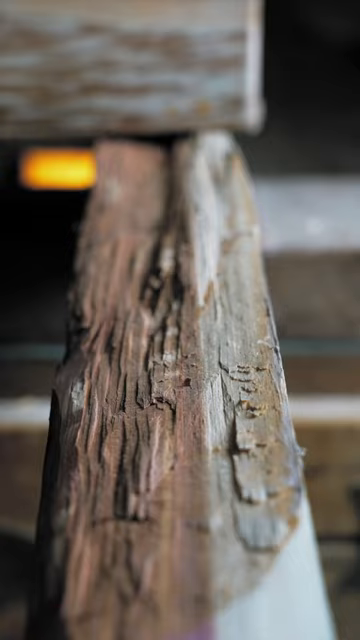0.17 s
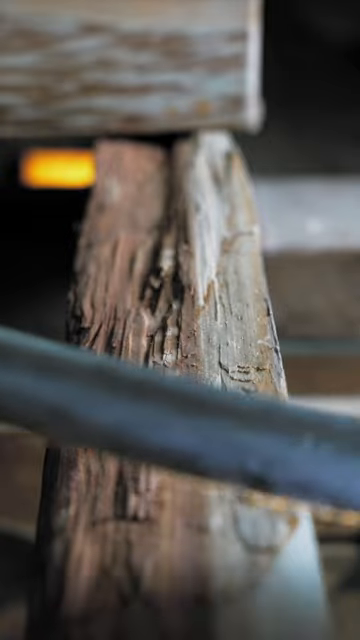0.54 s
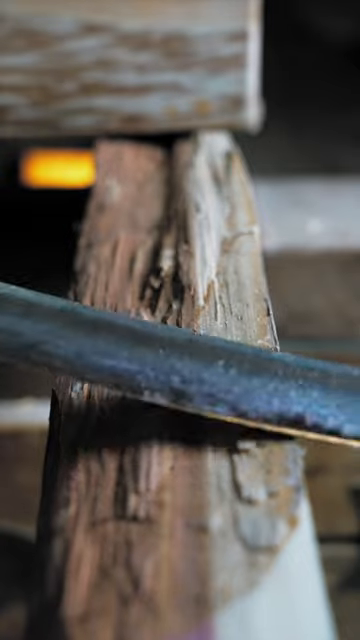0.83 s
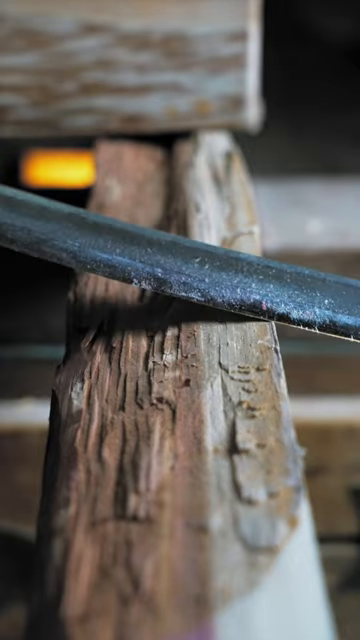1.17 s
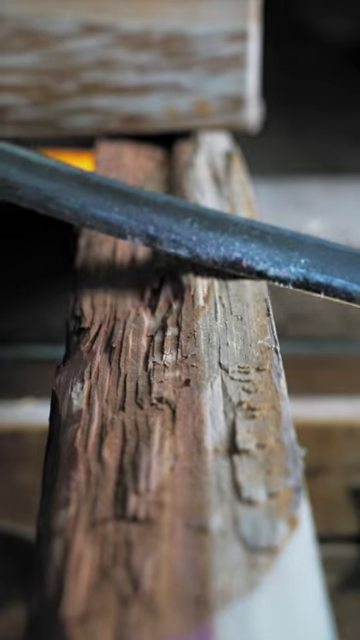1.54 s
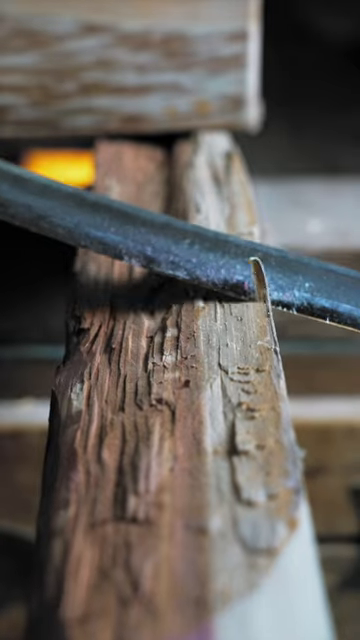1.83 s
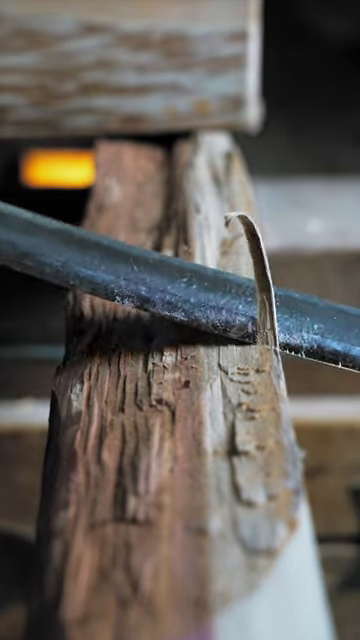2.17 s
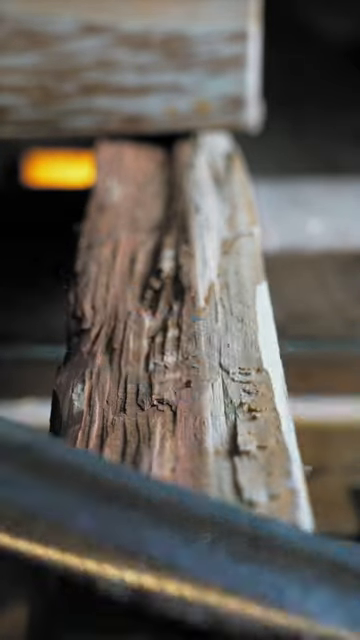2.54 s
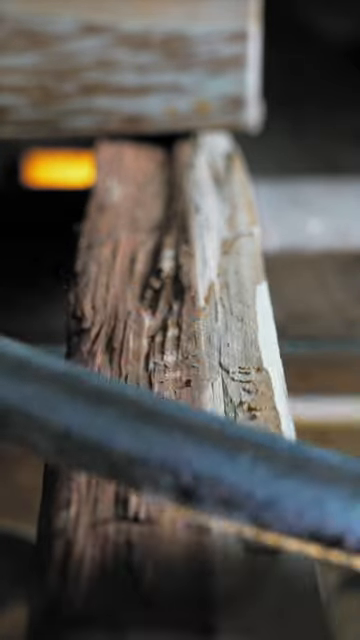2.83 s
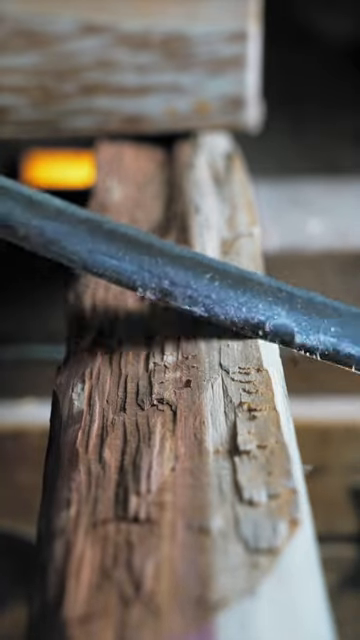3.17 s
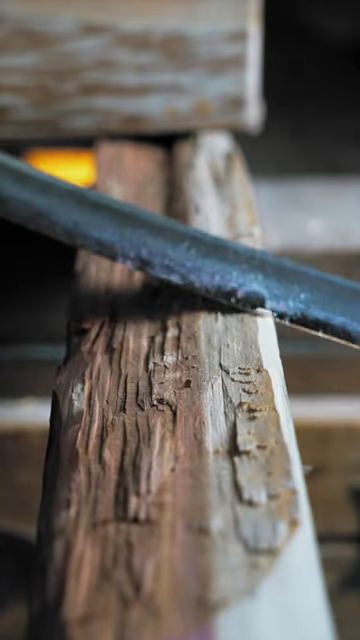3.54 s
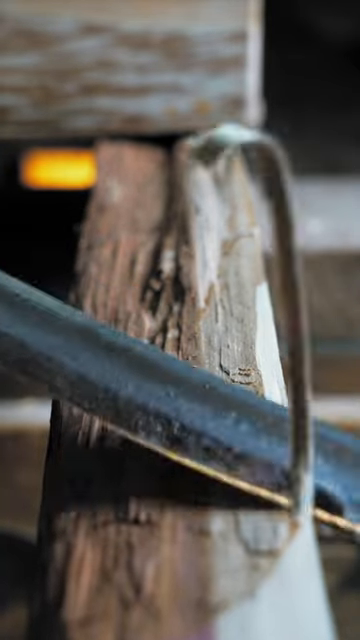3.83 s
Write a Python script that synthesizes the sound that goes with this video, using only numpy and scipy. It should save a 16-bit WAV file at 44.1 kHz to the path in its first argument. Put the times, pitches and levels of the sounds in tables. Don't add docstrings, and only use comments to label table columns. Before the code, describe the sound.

Drawknife scraping and slicing a wooden stave, fibres crackling brightly, one hard knock between pulls, quiet workshop

```python
import sys
import numpy as np
from scipy import signal
from scipy.fft import rfft, irfft
from scipy.io import wavfile
from scipy.ndimage import uniform_filter1d

SR = 44100
rng = np.random.default_rng(int(sys.argv[2]) if len(sys.argv) > 2 else 0)


def to_wav(s):
    ch = np.atleast_2d(s).T
    pcm = np.round(np.clip(ch, -1, 1) * 32767)
    wavfile.write(sys.argv[1], SR, pcm.astype(np.int16))


def elevation(decibels):
    levels = np.asarray(decibels, float)
    return 10 ** (levels / 20)


N = 176400
T = np.arange(N) / SR

# f/Hz, level/dB per Hz
ROOM_TONE = [(12, -24.5), (20, 6.5), (228, -4.5), (301, -6), (459, -7), (642, -30), (3950, -33),
             (13900, -34), (16000, -60)]
# f/Hz, width/Hz, level/dB
HUMS = [(462.5, 34, -71.5), (6750, 20, -102), (7260, 45, -97), (13900, 37, -101), (14200, 83, -92),
        (14300, 30, -103)]
# t/s, level/dB, f/Hz, length/s
LOW_THUMPS = [(0.51, -48, 87, 0.14), (0.85, -46, 60.7, 0.055), (1.8, -57.5, 43.4, 0.24),
              (2.223, -47.5, 67, 0.024), (1.955, -61, 191, 0.15), (2, -58.5, 188, 0.15),
              (3.1, -55.5, 200, 0.061), (2.1, -48, 372, 0.038), (2.628, -45.5, 75, 0.035),
              (3.025, -49, 370, 0.029), (3.218, -49.5, 70, 0.1), (3.635, -53, 76, 0.11),
              (3.63, -55.5, 179, 0.16), (3.684, -56, 339, 0.18), (3.96, -49.5, 54, 0.055)]
# t/s, level/dB, hard edge/dB, pitch factor
BLADE_KNOCKS = [
    (.853, -35, -31, .975),
    (0.889, -43, -17, .96),
    (2.646, -47.5, -14.5, 1.01),
    (3.202, -20.5, -9, 1),
]
# f/Hz, level/dB, time to fade 60 dB/s
STAVE_MODES = [(190.5, -22, .3), (294.8, -15, 0.3), (351, -16.5, 0.16), (411, -1.5, 0.063), (443, 2.5, .3),
               (487.3, -2, .12), (546, -7, 0.077), (665, -18, 0.072)]
# f/Hz, level/dB, time to fade 60 dB/s
EDGE_MODES = [(882, -2.5, 0.014), (1230, 4, 0.0088), (1675, 2, .01), (2550, -6, 0.0077),
              (3800, -22, 0.0034)]
# t/s, peak level/dB, f/Hz
FIBRE_SNAPS = [(0.1017, -48, 8300), (0.1949, -51, 8760), (0.1991, -28, 14900), (0.213, -35, 13100),
               (0.6564, -69, 14200), (1.807, -38.5, 15200), (1.8134, -51, 3200), (1.8491, -35.5, 11600),
               (1.8617, -34, 15100), (1.8844, -34, 15200), (1.8946, -28.5, 14200), (1.9084, -42, 15100),
               (1.9908, -30.5, 6260), (1.9984, -31, 10600), (2.019, -36, 11900), (2.029, -39.5, 6340),
               (2.062, -39, 3650), (2.079, -50, 3560), (2.121, -33.5, 13400), (2.1525, -43, 13100),
               (2.1954, -45, 8400), (2.2279, -31.5, 6700), (2.2324, -32, 13900), (2.2517, -24, 15500),
               (2.2554, -30, 15300), (2.2744, -36, 13200), (2.2807, -26, 15400), (2.3168, -31, 12540),
               (2.3236, -33, 14300), (2.3359, -20.5, 12350), (2.357, -30, 11900), (2.4068, -28.5, 10060),
               (2.4153, -28, 10050), (2.4498, -30, 7230), (2.454, -23.5, 4120), (2.4794, -35, 15100),
               (2.5151, -40, 3990), (2.5674, -35, 10700), (2.5714, -36, 10520), (2.595, -24, 11470),
               (2.8957, -53, 3093), (3.1388, -56, 7510), (3.6863, -33, 15100), (3.713, -37, 14800),
               (3.7235, -33, 15100), (3.7272, -28, 15200), (3.7472, -25, 14900), (3.7524, -34, 12300),
               (3.7663, -21.5, 14000), (3.771, -37.5, 14100), (3.7973, -20.5, 14200), (3.799, -31, 14200),
               (3.8044, -27, 14700), (3.808, -29, 14000), (3.8501, -20.5, 13800), (3.8602, -18, 13400),
               (3.8799, -17, 15200), (3.9478, -40, 10600), (3.9757, -32, 6660), (3.9964, -44, 8100)]
# t/s, length/s, level/dB, centre f/Hz
TEAR_BURSTS = [(-0, 0.12, -78, 10100), (0.18, 0.07, -79, 10600), (1.81, 0.02, -66, 11400),
               (1.857, 0.046, -53.5, 13200), (1.92, 0.074, -66, 11900), (1.987, 0.034, -54, 12000),
               (2.032, 0.18, -65.5, 11500), (2.221, 0.036, -52.5, 13200), (2.254, 0.036, -48, 15200),
               (2.297, 0.044, -43, 14000), (2.336, .006, -34.5, 12500), (2.34, 0.044, -40.5, 12100),
               (2.356, 0.0045, -30.5, 12000), (2.38, 0.032, -37.5, 11250), (2.431, 0.067, -57.5, 12400),
               (2.504, 0.034, -62, 11700), (2.527, 0.034, -67, 9000), (2.563, 0.048, -66, 8000),
               (3.136, 0.028, -68, 7300), (3.532, 0.056, -93, 11100), (3.58, .06, -79, 11500),
               (3.633, 0.12, -61.5, 12100), (3.69, 0.098, -52, 13300), (3.735, 0.1, -41.5, 11740),
               (3.761, 0.063, -41, 13900), (3.849, 0.014, -35, 13000), (3.868, 0.02, -43.5, 13000),
               (3.89, 0.095, -61, 11100)]
# f/Hz, level/dB
SHAVING_TONE = [(5000, -5), (8500, 3.5), (9600, -1.5), (10700, -4), (12000, 2.5), (13200, -2), (14300, 9),
                (16500, -8.5)]
# t/s, blade pressure/dB, stave shake/dB
PULLS = [
    [(.04, -69, -100), (.2, -75, -88), (.8, -105, -100)],
    [(.845, -99, -93), (.86, -62.5, -61), (.92, -64.5, -41.5), (1.04, -95, -114)],
    [(1.1, -77, -69), (1.14, -65, -54.5), (1.18, -70, -57.5), (1.26, -74.5, -68), (1.29, -70.5, -60),
     (1.34, -70, -52.5), (1.38, -71, -67.5), (1.41, -68, -55), (1.5, -86, -80)],
    [(1.56, -80.5, -73), (1.66, -65.5, -75), (1.88, -52.5, -60.5), (1.95, -55.5, -56), (2.02, -51.5, -59.5),
     (2.1, -59, -56), (2.19, -65, -66)],
    [(2.22, -58, -78), (2.26, -51, -58), (2.3, -52.5, -48), (2.37, -55.5, -78), (2.43, -49.5, -42.5),
     (2.49, -54, -52.5), (2.54, -65, -68), (2.6, -54.5, -48.5), (2.65, -61.5, -48)],
    [(2.76, -78, -71.5), (2.85, -85.5, -81), (2.9, -73.5, -66.5), (3.0, -72.5, -78), (3.12, -83, -94),
     (3.15, -69, -84), (3.3, -65, -73)],
    [(3.49, -84, -104), (3.53, -65, -87), (3.57, -56.5, -79), (3.6, -50, -53), (3.75, -47.5, -68),
     (3.8, -47.5, -48), (3.87, -46, -45.5), (3.91, -57, -66), (4.0, -64, -71)],
]
# f/Hz, width/Hz, level/dB
BLADE_MODES = [(850, 41, 0), (949, 70, 0), (1166, 22, -1), (1475, 30, -17), (1694, 43, -11.5),
               (1845, 35, -6), (2317, 80, -6.5), (2606, 110, -7.5), (2783, 50, -11), (3200, 110, -14),
               (3660, 130, -4), (4083, 60, -13.5), (4380, 70, -10), (6290, 200, -15)]
# f/Hz, level/dB per Hz
RUB_TONE = [(300, -29), (700, -3.5), (1300, -12), (2000, -18), (5000, -18), (16000, -25.5)]


def unit(x):
    return x / np.sqrt(np.mean(x ** 2) + 1e-30)


def band(x, hz, width):
    return signal.lfilter(*signal.iirpeak(min(hz, .45 * SR), max(hz / width, .3), fs=SR), x)


def ring(x, hz, t60):
    p = np.exp((2j * np.pi * hz - np.log(1000) / t60) / SR)
    return signal.lfilter([0, p.imag], [1, -2 * p.real, abs(p) ** 2], x + 1e-15)


def colour(table):
    f = np.maximum(np.arange(N // 2 + 1) * SR / N, 1)
    hz, db = np.array(table).T
    gain = elevation(np.interp(np.log(f), np.log(hz), db))
    return unit(irfft(rfft(rng.standard_normal(N)) * gain, N))


def walk(rate):
    hold = int(SR / rate)
    values = rng.standard_normal(N // 20)[:N // hold + 1]
    return unit(uniform_filter1d(np.repeat(values, hold)[:N], hold))


def grit(rate, spread_db):
    x, count = np.zeros(N), int(rate * N / SR)
    size = rng.standard_normal(count) * elevation(spread_db * np.minimum(rng.exponential(size=count), 4))
    x[rng.integers(0, N, count)] = size
    return unit(x)


def control(axis):
    rows = np.array([point for pull in PULLS for point in pull])
    return np.interp(T, rows[:, 0], rows[:, axis])


def taps(rows, db):
    x = np.zeros(N)
    x[(np.array(rows)[:, 0] * SR).astype(int)] = elevation(db)
    return x


def tail(x, t60, db, damp):
    t = np.arange(SR // 2) / SR
    noise = signal.lfilter([1], [1, -np.clip(damp, 0, .98)], rng.standard_normal(len(t)))
    echoes = noise * np.exp(-np.log(1000) * t / t60) * (t > .002)
    return elevation(db) * signal.fftconvolve(x, echoes / np.sqrt(np.sum(echoes ** 2)))[:N]


def shop():
    air = elevation(-67.5 + walk(2.5)) * colour(ROOM_TONE)
    hum = sum(elevation(db + 2 * walk(8)) * unit(band(rng.standard_normal(N), f, w)) for f, w, db in HUMS)
    return air + hum


def thumps():
    out = 0
    for s, db, hz, length in LOW_THUMPS:
        rise = np.clip((T - s) / 0.045, 0, 1)
        fade = np.exp(-np.maximum(T - s - length / 2, 0) / (0.8 * length))
        width = min(0.89 * hz, 70)
        rumble = unit(band(band(rng.standard_normal(N), hz, width), hz, width))
        out = out + elevation(db) * rise * fade * rumble
    return out


def knocks():
    rattle_s, body_lag_s = .004, 0.00352
    grip_s, grip_fall_s, grip_db = .095, 0.0088, -13
    k, body, t = np.array(BLADE_KNOCKS), np.zeros(N), T[:SR // 2]
    burst = rng.standard_normal(900) * np.exp(-np.arange(900) / SR / rattle_s)
    rattle = signal.fftconvolve(taps(k, k[:, 1] + k[:, 2]), burst)[:N] * 0.11
    edge = sum(elevation(db) * ring(rattle, f, t60) for f, db, t60 in EDGE_MODES)
    push = np.pad(np.hanning(70) / 25, (0, len(t) - 70))
    grip = elevation(grip_db * np.clip((t - grip_s) / grip_fall_s, 0, 1))
    for s, level_db, _, pitch in BLADE_KNOCKS:
        note = 0
        for i, (f, db, t60) in enumerate(STAVE_MODES):
            note = note + (-1) ** i * elevation(db) * ring(push, f * pitch, t60)
        body[int((s + body_lag_s) * SR):][:len(t)] += elevation(level_db) * grip * note
    return body + edge + tail(edge, 0.29, -6.5, 0)


def snaps():
    snap_s, click_db, low_hz = .00025, 1, 3500
    out, t = np.zeros(N + 200), np.arange(200) / SR
    swell = t / snap_s * np.exp(-t / snap_s)
    for s, db, hz in FIBRE_SNAPS:
        high_pass = signal.butter(2, max(hz / 2, low_hz), "high", fs=SR, output="sos")
        click = signal.sosfilt(high_pass, rng.standard_normal(len(t)))
        x = swell * (np.sin(2 * np.pi * hz * t) + elevation(click_db) * click)
        out[int((s + snap_s) * SR):][:len(t)] += elevation(db) * x / np.abs(x).max()
    return out[:N]


def tearing():
    tears_per_s, spread_db, fizz_db = 4000, 2.2, -3
    rise_s, fall_s, width_octaves = .003, .007, .2
    shared = grit(tears_per_s / 5, spread_db)
    bands = 5000 * 2 ** np.arange(0, 1.75, .12)
    step = 20
    shaving = elevation(np.interp(bands, *np.array(SHAVING_TONE).T))
    t, power = T[::step], 0
    for s, length, db, hz in TEAR_BURSTS:
        w = (np.exp(-(np.log2(bands / hz) / width_octaves) ** 2 / 2) + 0.099) * shaving
        env = np.clip((t - s) / rise_s, 0, 1) * np.exp(-np.maximum(t - s - length, 0) / fall_s)
        power = power + np.outer(w ** 2 / np.sum(w ** 2), (elevation(db) * env) ** 2)
    out = 0
    for gain, hz in zip(np.sqrt(power), bands):
        clicks = .5 * shared + grit(tears_per_s / 8, spread_db)
        x = clicks + elevation(fizz_db) * rng.standard_normal(N)
        ringing = unit(band(band(x, hz, hz / 12), hz, hz / 12))
        out = out + np.repeat(gain, step)[:N] * elevation(3 * walk(30)) * ringing
    return elevation(2 * walk(350)) * out


def scrape():
    press = control(axis=1)
    bite = elevation(.5 * np.minimum(press + 60, 0))
    friction = grit(820, 2.5) + 1.1 * rng.standard_normal(N)
    steel = 0
    for k, (f, width, db) in enumerate(BLADE_MODES):
        rings_lightly = 1600 < f < 2000 or 2450 < f < 2900 or f > 4000
        touch = 1 if rings_lightly else bite
        level = (-1) ** k * elevation(db + 3.18 * walk(18))
        steel = steel + level * unit(band(friction, f, width)) * touch
    rubbing = elevation(3.5) * bite ** 2 * colour(RUB_TONE)
    blade = elevation(press + 1.93 * walk(60) - 10.5) * (steel + rubbing)
    push = band(band(grit(300, 2.7), 380, 440), 400, 640)
    shake = unit(sum(elevation(db) * ring(push, f, t60) for f, db, t60 in STAVE_MODES))
    return blade + elevation(control(axis=2) - 4.0) * shake


def scene():
    room_db, knock_room_db = -17, -24
    bright, wood, blows = tearing() + snaps(), scrape(), knocks()
    mix = bright + tail(bright, .07, -17, 0) + wood + blows
    mix = mix + tail(wood + elevation(knock_room_db - room_db) * blows, .3, room_db, 0.901)
    return (mix + thumps() + shop())[None]


def roll_off(x):
    return signal.sosfilt(signal.butter(12, 16810, fs=SR, output="sos"), x)


def record(dry):
    start_s, open_s, top_hz = 0.036, 0.0014, 15900
    low_pass = signal.ellip(6, .3, 32, top_hz, fs=SR, output="sos")
    mix = signal.sosfilt(low_pass, dry) * np.clip((T - start_s) / open_s, 0, 1)
    return roll_off(mix)


dry = scene()
out = record(dry)
to_wav(out)
```